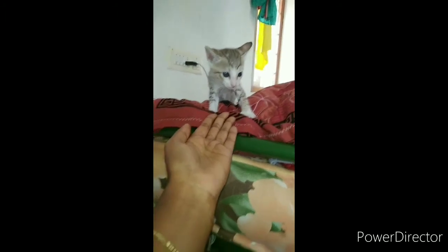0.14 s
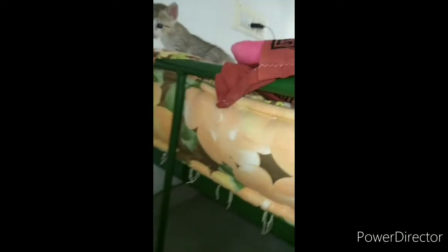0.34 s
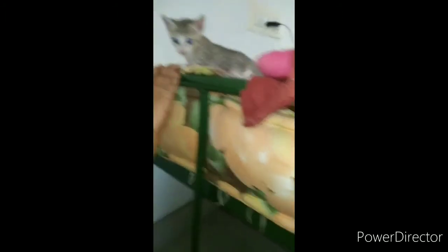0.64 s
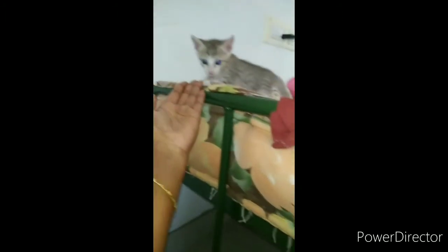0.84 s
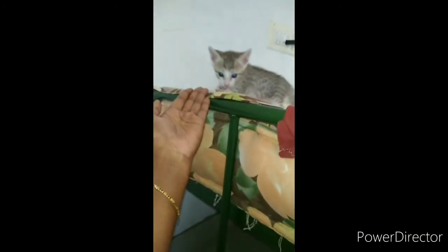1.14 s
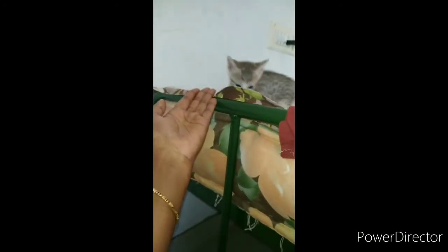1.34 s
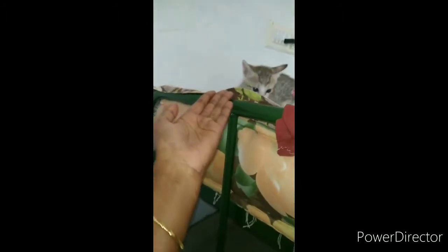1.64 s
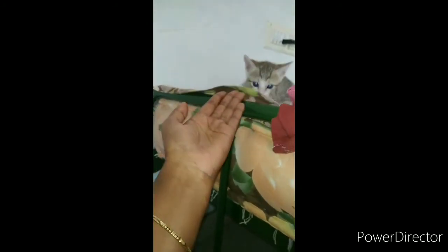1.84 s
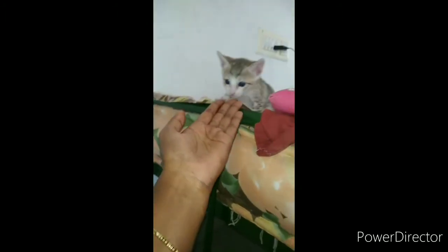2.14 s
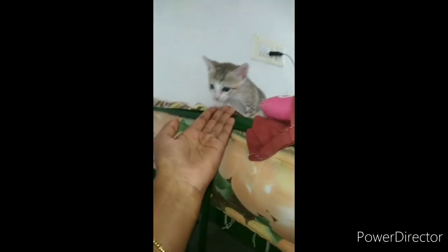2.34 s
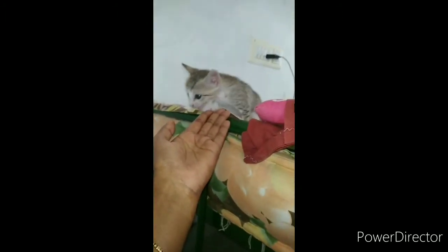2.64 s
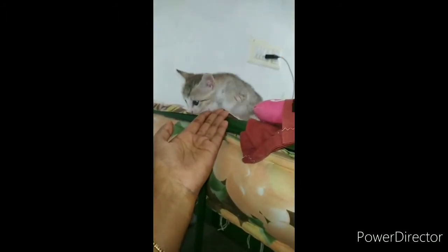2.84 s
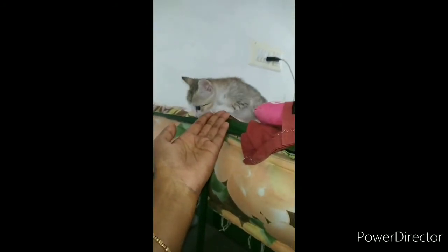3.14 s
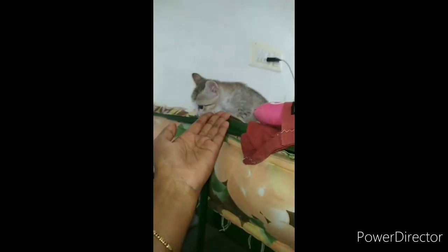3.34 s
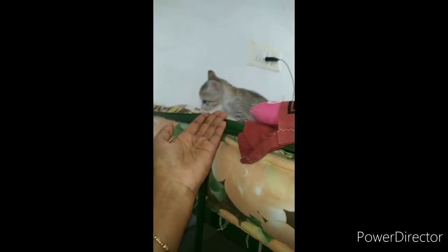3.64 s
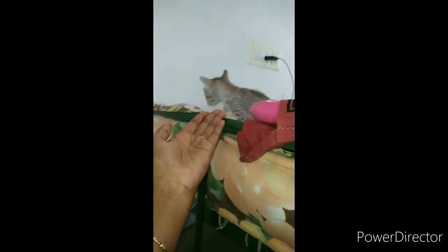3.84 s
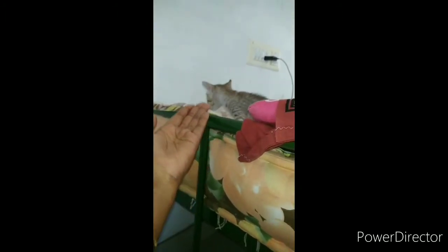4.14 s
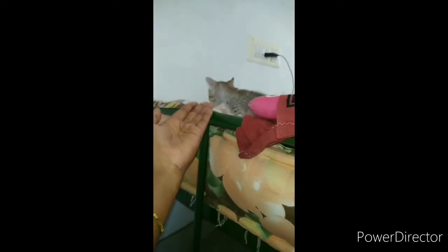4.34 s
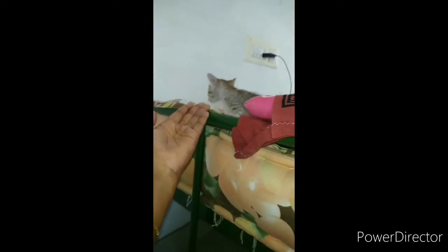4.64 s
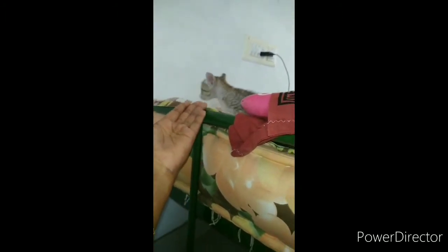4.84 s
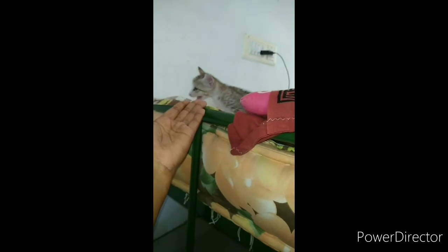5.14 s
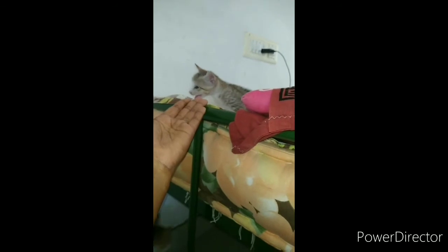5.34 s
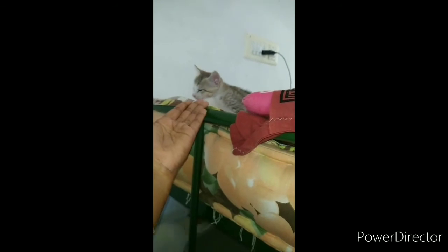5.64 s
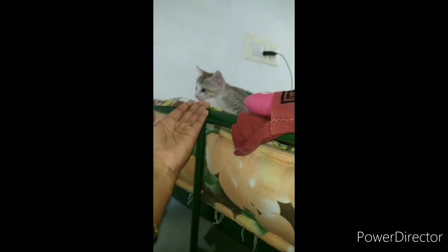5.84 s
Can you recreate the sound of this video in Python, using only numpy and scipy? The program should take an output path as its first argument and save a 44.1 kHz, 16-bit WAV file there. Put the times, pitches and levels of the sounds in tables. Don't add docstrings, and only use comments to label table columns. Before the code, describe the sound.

A hand-held stereo phone in a small furnished room, with soft steady hiss and slight low rumble. Handling hum sits on the left until 0.35 s, with a faint peep; a short falling kitten mew follows at 0.35-0.5. From 1.2 to 1.9 a far kitten's rising mew, a half-grown cat's lower rise and fall, and a bright near mew overlap, with crisp claw snags near 1.3 and cloth rustling. A thin mew wavers and breaks at 2.1-2.6, with claw ticks to 2.7. The loudest open mew arches at 2.7-3.2, cracking as it falls; small far mews follow to 3.45. A light knock comes at 3.65. An older cat calls lower and rougher from 4.0 to 5.1, slowly rising, then breaking downward. A near mew falls at 5.3-5.8, overlapped by a distant one, as taps cluster from 5.4 to the end. Very faint high chirps drift in from outside.

```python
import sys
import numpy as np
from scipy import signal
from scipy.fft import rfft, irfft, next_fast_len
from scipy.io import wavfile
from scipy.ndimage import uniform_filter1d, map_coordinates

SR = 44100
rng = np.random.default_rng(int(sys.argv[2]) if len(sys.argv) > 2 else 0)


def boost_factor(decibels):
    exponent = np.asarray(decibels, float) / 20
    return 10 ** exponent


def generate_wav(signal):
    frames = np.transpose(np.atleast_2d(signal))
    scaled = np.clip(frames, -1, 1) * 32767
    pcm = np.round(scaled).astype(np.int16)
    wavfile.write(sys.argv[1], SR, pcm)


N = 263700
T = np.arange(N) / SR

# t/s, level over rest/dB
HAND_STIRS = [(0, 12.5), (.15, 4.5), (.32, 2), (.5, 0.5), (1.2, 1.3), (1.9, 2), (2.8, 1.4), (3.35, 0.5),
              (4.02, -1.5), (4.5, 2), (5.05, -0.5), (5.3, 1.7), (5.75, 6), (5.98, 5.5)]


def unit(x):
    return x / np.sqrt(np.mean(x ** 2) + 1e-20)


def along(points, hz):
    f, v = np.transpose(points)
    return np.interp(np.log(hz + 1), np.log(f + 1), v)


def wobble(rate, size=N):
    knots = rng.standard_normal(int(size * rate / SR) + 4)
    return map_coordinates(knots, [np.arange(size) * rate / SR])


def filtered(x, response):
    m = next_fast_len(N + 8192)
    return irfft(rfft(x, m) * response(np.fft.rfftfreq(m, 1 / SR)), m)[..., :N]


def coloured(curve, shape=N):
    return unit(filtered(rng.standard_normal(shape), lambda hz: boost_factor(along(curve, hz))))


def span(rows, fade=0.0011):
    s, *cols = np.transpose(rows)
    t = T[(T >= s[0]) & (T < s[-1])]
    edge = np.clip(np.minimum(t - t[0], t[-1] - t) / fade, 0, 1)
    return round(t[0] * SR), [np.interp(t, s, c) for c in cols], edge


def glide(start, length, from_hz, to_hz, db, *steady):
    rise_db, fall_db, peak_at = 4, 6, 0.4
    return [(start, from_hz, db - rise_db, *steady),
            (start + peak_at * length, from_hz + peak_at * (to_hz - from_hz), db, *steady),
            (start + length, to_hz, db - fall_db, *steady)]


def echoes(x):
    # f/Hz, level/dB
    soak = [(300, 4.5), (600, 5.5), (1300, 7), (3000, 2), (8000, 16), (15000, 14)]
    # f/Hz, t60/s
    room = [(300, 0.31), (1300, 0.42), (3000, 0.45), (8000, 0.27), (15000, 0.24)]
    hz, t, z = signal.stft(rng.standard_normal((2, SR // 2)), SR, nperseg=256)
    decay_db = along(soak, hz)[:, None] - 60 * t / along(room, hz)[:, None]
    tail = signal.istft(z * boost_factor(decay_db), SR, nperseg=256)[1]
    late = np.pad(x, (130, 0))[None]
    return signal.fftconvolve(late, tail / np.sqrt(SR / 40), axes=1)


def cat(calls, places, jitter, shimmer_db, lift_db, breath_db, muffle, mouth, first_pan_db, blur, level_bends):
    # t/s, width/s, pitch scatter/share
    cracks = [
        (1.87, 0.03, 0.089),
        (2.458, 0.083, 0.029),
        (3.195, 0.014, 0.086),
        (4.821, 0.098, 0.0504),
        (4.93, 0.047, 0.038),
        (5.09, 0.12, 0.062),
        (5.73, 0.028, 0.018),
    ]
    # f/Hz, level/dB per Hz
    breath_colour = [(350, -70), (700, -16), (1500, -6), (4200, 2.5), (5500, -14), (7000, -3.5),
                     (9000, -27), (11000, -23.5), (14500, -7.5)]
    # f/Hz, level/dB per Hz
    rasp_colour = [(300, -60), (500, -27), (1200, 15), (2200, 5), (4500, -1), (6500, -10)]
    breath_top_db, softening = -29, 0.5
    third_fades = 0.26
    out = np.zeros((2, N + SR))
    hiss, rasp = coloured(breath_colour), coloured(rasp_colour)
    k = np.arange(1, 19)[:, None]
    for rows, (lag, pan_db, room_db, upper_db, third_db) in zip(calls, places):
        start, (pitch, loud_db, opening_db), edge = span(rows)
        size = len(pitch)
        here = slice(start, start + size)
        t = T[here]

        rough = sum(depth * np.exp(-((t - s) / width) ** 2) for s, width, depth in cracks)
        pitch = uniform_filter1d(pitch, size=700, mode="nearest")
        drift = wobble(22.09, size) + 0.92 * wobble(69.57, size)
        pitch = pitch * (1 + jitter * drift + rough * wobble(260, size))
        phase = 2 * np.pi * np.cumsum(pitch) / SR

        low_db = loud_db + np.minimum([-opening_db, opening_db], 0)
        strongest_db = np.max(low_db, 0)
        effort_db = uniform_filter1d(strongest_db, size=1500, mode="nearest")
        effort_db += softening * (effort_db - effort_db.max())
        effort_db += muffle * np.minimum(opening_db, 0)
        first_two = np.add(low_db, np.c_[lift_db])
        third = effort_db + third_db - third_fades * np.maximum(opening_db, 0)
        upper = effort_db + upper_db + along(mouth, k[3:] * pitch)
        level = np.vstack([first_two, third, upper])
        for s, width, which, db in level_bends:
            if abs(s - t).min() < 3 * width:
                level[np.minimum(k[:, 0], 4) == round(which)] += db * np.exp(-((t - s) / width) ** 2)
        shimmer = np.array([wobble(94.57, size) for _ in k])
        level -= shimmer_db * shimmer ** 2 - 0.18
        gain = np.sqrt(2) * boost_factor(level) * (k * pitch < SR / 2.7) * edge

        haze = np.clip(k / 6, 0, 1.5) * np.array([wobble(180, size) for _ in k])
        ports = []
        for side in (-1, 1):
            port_gain = gain * boost_factor(-side * (k == 1) * first_pan_db / 2)
            port_phase = phase + side * np.pi * pitch * lag / SR
            ports.append(np.sum(port_gain * np.sin(k * port_phase + k * k + blur * haze), 0))

        air = hiss[here] * (1 + np.cos(phase))
        breath = boost_factor(min(breath_db, breath_top_db)) * air * np.max(boost_factor(level[:3]), 0) * edge
        crack_gain = 7.0 * rough * boost_factor(uniform_filter1d(strongest_db, size=1500))
        breath += crack_gain * rasp[here] * edge
        tail = boost_factor(room_db) * echoes(ports[0] + breath)
        out[:, here] += (np.array(ports) + breath) * boost_factor([[pan_db / 2], [-pan_db / 2]])
        out[:, start:start + tail.shape[1]] += tail
    return out[:, :N]


def near_kitten():
    # t/s, pitch f/Hz, effort level/dB, mouth opening as 2nd harmonic over 1st/dB
    calls = [
        [(0.333, 1340, -47.5, -4.5), (0.375, 1268, -49.5, -16), (0.405, 1201, -40, -38),
         (0.435, 1222, -56, -20), (0.465, 1259, -48.5, -28), (0.485, 1178, -70, -16), (0.54, 1219, -64.5, -18),
         (0.62, 1215, -81, -22)],
        [(1.43, 1457, -53, -30), (1.45, 1531, -40, -15.5), (1.575, 1627, -42.5, -10.5), (1.642, 1533, -37, -35),
         (1.69, 1443, -44.5, -19), (1.786, 1245, -46, -24), (1.852, 1077, -52, -29), (1.89, 1040, -61, -14)],
        [(2.718, 1087, -49.5, 1), (2.744, 1100, -51.5, -23), (2.815, 1509, -35.5, 15), (2.86, 1612, -39, 1),
         (2.91, 1567, -35.5, 6), (2.995, 1555, -39, -4), (3.075, 1404, -44.5, -8), (3.135, 1230, -45, -2.5),
         (3.178, 976, -46, 4.5)],
        [(5.323, 1720, -45.5, -12), (5.346, 1793, -39.5, -0.5), (5.376, 1752, -37, 3.5), (5.44, 1668, -38, 1.5),
         (5.495, 1627, -38, -9.5), (5.62, 1440, -35, -24), (5.69, 1312, -42, -30), (5.77, 1054, -57.5, -14),
         (5.83, 1034, -65, -10)],
    ]
    # left lag/samples, left-right/dB, room/dB, upper harmonics/dB, 3rd harmonic/dB
    places = [(7.2, 8, -3, -7, -18), (7.3, 3.5, -9.5, -11, -8), (8.1, 6.5, -11.5, -12.5, -10),
              (8.6, 4, -9, -14, -14.5)]
    # f/Hz, level/dB
    mouth = [(3500, 23), (5200, -18), (6500, -8.5), (8000, -14), (9500, -9.5), (12500, -13), (14200, -16)]
    # t/s, width/s, harmonic (4 = all higher), level/dB
    level_bends = [(.391, 0.0053, 1, -11), (2.811, 0.0069, 2, -24), (2.83, .01, 2, 6), (2.854, 0.0095, 2, -9),
                   (2.876, 0.0067, 2, 3.5), (2.909, 0.0026, 2, -3), (2.93, 0.0043, 2, -9), (2.945, .01, 2, 3.5),
                   (2.985, 0.0053, 2, 0), (3.026, 0.02, 1, -22), (3.08, 0.0071, 1, 6.5), (3.15, 0.017, 2, 0),
                   (5.368, 0.0089, 2, 2), (5.47, 0.0083, 2, 11), (5.55, 0.017, 1, -2), (5.644, 0.0088, 1, 2.5),
                   (5.657, .005, 1, -6), (5.68, .07, 3, -16), (5.75, .05, 2, 10), (2.745, 0.012, 1, 6.5),
                   (2.795, 0.016, 1, -5), (2.9, .006, 2, 4.5), (2.919, 0.0056, 2, 7.5), (3.003, 0.0072, 2, 4),
                   (5.62, 0.0089, 1, 1), (3.04, .045, 4, 5.5), (2.82, 0.033, 4, 2), (.435, .008, 1, -5),
                   (.49, 0.013, 1, -9), (5.44, .06, 4, 0), (1.66, 0.041, 2, 6)]
    return cat(calls, places, jitter=0.00443, shimmer_db=2.5, lift_db=[1.5, 7], breath_db=-28, muffle=0.4,
               mouth=mouth, first_pan_db=-6.0, blur=0.64, level_bends=level_bends)


def far_kitten():
    # t/s, pitch f/Hz, effort level/dB, mouth opening as 2nd harmonic over 1st/dB
    calls = [
        [(1.19, 811, -62, -13), (1.26, 1192, -57.5, 3.5), (1.32, 1334, -56.5, 7), (1.365, 1348, -59.5, 11),
         (1.395, 1339, -47.5, 15), (1.46, 1302, -54.5, 6), (1.606, 1198, -39.5, -25.5), (1.636, 1253, -53, -17),
         (1.66, 1260, -88, -9)],
        [(2.065, 1112, -69, 15), (2.12, 1286, -52.5, 13.5), (2.22, 1384, -53.5, 5), (2.31, 1334, -54, 13.5),
         (2.39, 1324, -58.5, -4), (2.425, 1262, -55, -17), (2.454, 1296, -54, -27), (2.532, 1420, -67, -43),
         (2.62, 1277, -102, -39)],
        [(3.025, 1104, -54.5, 9), (3.065, 1218, -53, 16), (3.1, 1306, -56, 16), (3.13, 1280, -58, 12),
         (3.2, 1247, -52, 2), (3.235, 1263, -67, 2)],
        [(3.235, 1231, -61, -4), (3.285, 1247, -54.5, -19), (3.331, 1297, -52.5, -26),
         (3.359, 1366, -49.5, -53), (3.45, 1362, -60, -40)],
        [(5.57, 1377, -54, -2), (5.61, 1390, -47.5, -2.5), (5.67, 1390, -56.5, 9), (5.71, 1400, -56, -3),
         (5.79, 1315, -55, -1.5), (5.866, 1236, -53.5, -12), (5.97, 1154, -73, -5)],
    ]
    # left lag/samples, left-right/dB, room/dB, upper harmonics/dB, 3rd harmonic/dB
    places = [(10.2, 6.7, -9.5, -18, 4.5), (4.6, 10.8, -3.5, -25.5, -9.5), (7, 1.9, -12, -22.5, 0),
              (4.3, 2.9, -12, -12, -27), (9.7, 3.6, -6, -46, -14)]
    # t/s, length/s, from f/Hz, to f/Hz, peak level/dB
    peep_rows = [
        (0, .07, 1230, 1190, -58),
        (.435, .055, 1370, 1485, -55),
        (2.0, .04, 873, 859, -60),
        (.337, .07, 1010, 980, -62),
        (3.99, .045, 990, 1110, -61),
        (5.475, .05, 800, 910, -61),
        (3.176, .024, 880, 740, -55),
    ]
    peep_place = (5, 6, -8, -32, -15)
    # f/Hz, level/dB
    mouth = [(3500, -3), (5300, 5), (6800, 10.5), (8000, 2.5), (9500, 10.5), (12000, 7), (14500, -2)]
    # t/s, width/s, harmonic (4 = all higher), level/dB
    level_bends = [(1.345, .04, 3, 8), (1.335, 0.015, 2, 2), (1.25, .025, 2, -1), (1.23, .04, 1, 1),
                   (1.51, 0.14, 3, -20), (1.54, 0.048, 1, -4.5), (2.237, .005, 2, 7), (2.215, .008, 2, 3.5),
                   (2.229, 0.0026, 2, -10), (2.249, 0.0036, 2, -6), (2.265, 0.012, 2, 4.5),
                   (2.14, 0.023, 2, -3), (2.17, 0.059, 4, -6), (2.41, 0.017, 1, -6), (1.61, 0.016, 1, 4),
                   (2.3, 0.017, 1, 6.5), (2, 0.014, 1, -17), (2.485, .012, 1, 5.5)]
    peeps = [glide(*row, -16) for row in peep_rows]
    return cat(calls + peeps, places + [peep_place] * len(peeps), jitter=0.00586, shimmer_db=8.0,
               lift_db=[1.5, 6], breath_db=-26, muffle=0.66, mouth=mouth, first_pan_db=4.5, blur=0.92,
               level_bends=level_bends)


def young_cat():
    # t/s, pitch f/Hz, effort level/dB, mouth opening as 2nd harmonic over 1st/dB
    calls = [
        [(1.222, 514, -53.5, 2.5), (1.27, 535, -52.5, 5), (1.308, 666, -52.5, -13), (1.385, 869, -55, -13),
         (1.428, 937, -46.5, -14), (1.48, 1048, -46, -12), (1.572, 1046, -49.5, -1), (1.668, 973, -50, -5.5),
         (1.76, 853, -60, -14)],
    ]
    # left lag/samples, left-right/dB, room/dB, upper harmonics/dB, 3rd harmonic/dB
    places = [(0, 0, -24, -6.5, -10)]
    # f/Hz, level/dB
    mouth = [(2900, -6), (3500, 1), (4200, 3), (5200, -19), (6200, -24), (9000, -14), (11000, -18),
             (14500, -24)]
    # t/s, width/s, harmonic (4 = all higher), level/dB
    level_bends = [(1.3, 0.16, 4, -16), (1.34, 0.14, 3, -12), (1.58, 0.11, 2, -3)]
    return cat(calls, places, jitter=0.0033, shimmer_db=2.5, lift_db=[-1.5, -2], breath_db=-40, muffle=0.15,
               mouth=mouth, first_pan_db=0.0, blur=0.55, level_bends=level_bends)


def older_cat():
    # t/s, pitch f/Hz, effort level/dB, mouth opening as 2nd harmonic over 1st/dB
    calls = [
        [(4.0, 345, -62, 2), (4.05, 407.7, -54, -0.5), (4.12, 492, -52.5, -1.5), (4.2, 549.7, -52, 5),
         (4.3, 570.5, -53.5, 1), (4.42, 547.2, -53, 0.5), (4.6, 564.4, -50, -17.5), (4.7, 577, -47, -4),
         (4.794, 531.8, -50.5, -3)],
        [(4.79, 540, -50.5, -3), (4.86, 494.5, -60, 0), (4.93, 438.3, -59.5, 2.5), (4.975, 446, -56, -2),
         (5.045, 422.7, -59, -3.5), (5.12, 401, -67, -10)],
    ]
    # left lag/samples, left-right/dB, room/dB, upper harmonics/dB, 3rd harmonic/dB
    places = [(-6.5, 1, -8.5, -23, -2.5), (-7.5, 0.69, -7.5, -28, -4.5)]
    # f/Hz, level/dB
    mouth = [(2200, 8.5), (2900, 8.5), (3500, -15), (4200, 5.5), (5500, -22), (7000, -15), (9000, -13),
             (11000, -27), (14500, -19)]
    # t/s, width/s, harmonic (4 = all higher), level/dB
    level_bends = [(4.012, 0.025, 2, -11), (4.005, 0.036, 1, -3.5), (4.058, .025, 3, -10), (4.1, 0.015, 2, 5),
                   (4.12, 0.011, 2, -6), (4.125, 0.03, 3, -10.5), (4.15, 0.024, 2, 7), (4.229, 0.011, 2, -13),
                   (4.229, 0.015, 3, -9), (4.4, 0.055, 2, -2.5), (4.41, 0.049, 1, -6.5), (4.488, 0.037, 1, 2.5),
                   (4.575, 0.049, 3, 4), (4.6, .015, 2, -5), (4.645, 0.0099, 2, 9), (4.672, 0.0089, 2, -21),
                   (4.76, 0.015, 1, -29), (4.2, 0.22, 4, 1.5), (4.5, 0.093, 4, 0.5), (4.9, 0.038, 1, -6),
                   (5.005, 0.01, 1, -7), (5.045, 0.014, 1, 7.5), (5.115, 0.027, 1, -14), (4.968, .015, 2, -12)]
    return cat(calls, places, jitter=0.0062, shimmer_db=0.0, lift_db=[0.1, 0.6], breath_db=-27, muffle=0.13,
               mouth=mouth, first_pan_db=5.0, blur=1.07, level_bends=level_bends)


def bedding():
    # t/s, length/s, level/dB, change by its end/dB
    rustles = [
        (0, 0.16, -77, 0),
        (0.382, 0.15, -78.5, 7),
        (1.209, 0.18, -69, 6),
        (1.589, 0.18, -64.5, -6),
        (2.977, 0.32, -66.5, -4),
        (4.074, 0.56, -73, -0.5),
        (4.68, 0.19, -72, -11),
        (5.44, 0.072, -82, -3),
        (5.7, 0.22, -76.5, 2.5),
    ]
    # t/s, peak level/dB, thump level/dB, knock level/dB, t60/s
    taps = [
        (2.0154, -59.5, -25, -15, 0.27),
        (3.648, -57, -0.5, 15.5, 0.026),
        (5.4407, -39.5, -17, -6, 0.018),
        (5.614, -28.5, -13.5, -6.5, 0.013),
        (5.707, -30.5, -18, -32, 0.01),
        (5.7374, -36, -9.5, -25.5, 0.021),
        (5.774, -44.5, -27, -10, 0.038),
        (5.876, -47.5, -7, -15, 0.042),
        (5.914, -35.5, -9.5, -31, 0.015),
        (5.963, -43, -14, -24, 0.021),
    ]
    # f/Hz, level/dB per Hz
    cloth_colour = [(300, -34), (1500, -6), (4000, 1.5), (5500, -3.5), (7000, -0.5), (9000, 6), (12000, -6),
                    (15500, -6)]
    # f/Hz, level/dB per Hz
    knock_colour = [(200, -21), (500, 9), (1200, -6), (2100, -4.5), (3000, -15)]
    rub = np.zeros(N)
    for s, length, from_db, change_db in rustles:
        start, (db,), edge = span([(s, from_db), (s + length, from_db + change_db)], fade=0.035)
        rub[start:start + len(db)] = boost_factor(db + 9.5) * edge
    t = np.arange(SR // 8) / SR
    puff, push, knock = np.zeros((3, N + SR))
    for s, db, thump_db, knock_db, t60 in taps:
        hit = slice(round(s * SR), round(s * SR) + len(t))
        knock[hit] += boost_factor(db + knock_db - 9 - 60 * t / 0.04)
        puff[hit] += boost_factor(db - 1.0 - 60 * t / max(t60 * 3, 0.005)) * (1 - np.exp(-t / 0.0046))
        push[hit] += boost_factor(db + thump_db + 12.0) * np.sin(2 * np.pi * 110 * t) * np.exp(-t / 0.0028)
    grain = rng.standard_normal((2, N)) * boost_factor(0.76 * wobble(150))
    both_ports = grain[0] + 0.39 * grain[1] * np.c_[[1, -1]]
    cloth = unit(filtered(both_ports, lambda hz: boost_factor(along(cloth_colour, hz))))
    clumps = boost_factor(2.2 * wobble(30))
    return cloth * (rub * clumps + puff[:N]) + push[:N] + knock[:N] * coloured(knock_colour)


def claws():
    # t/s, peak level/dB, t60/s
    snags = [(1.193, -63, .008), (1.207, -53, 0.0051), (1.277, -40.5, 0.012), (1.296, -75, .008),
             (1.31, -48, 0.013), (1.322, -41, .012), (1.332, -48, 0.0073), (1.338, -49, .008),
             (2.556, -51, 0.015), (2.5674, -41, .004), (2.57, -55, 0.047), (2.6051, -43, 0.006),
             (2.658, -53, .015), (2.682, -61, 0.014), (2.688, -47.5, 0.007), (4.1066, -57, .012),
             (4.3065, -46, .01)]
    # f/Hz, level/dB per Hz
    claw_colour = [(2500, -30), (5500, -2), (7500, -3), (9200, 11), (11000, -13), (13500, -20),
                   (15500, -5.5)]
    t, bursts = np.arange(SR // 8) / SR, np.zeros(N + SR)
    for s, db, t60 in snags:
        bursts[round(s * SR):][:len(t)] += boost_factor(db - 60 * t / max(t60, 0.004))
    return coloured(claw_colour, (2, N)) * bursts[:N]


def handling_hum():
    # f/Hz, width/Hz, level/dB, left lead/dB
    resonances = [(79, 11, 8, 26), (140, 12, 3, 20), (236, 10.4, 9, 20), (281, 12, -9, 15),
                  (471, 18, -9.5, -1), (642, 7.9, -2, 1), (704, 10, -5, -2), (949, 7.5, -8.5, -9)]
    level_db, ends_s, fade_s = -52.5, 0.354, 0.037

    def body(f):
        return sum(boost_factor([[db], [db - left_db]]) * 1j * f * w / (c * c - f * f + 1j * f * w)
                   for c, w, db, left_db in resonances)

    fade = np.clip((ends_s - T) / fade_s, 0, 1)
    return boost_factor(level_db) * fade * unit(filtered(rng.standard_normal(N), body))


def rumble():
    # f/Hz, level/dB per Hz
    rumble_colour = [(25, -8), (60, -7), (250, -4), (500, -12.5), (900, -32)]
    stir_db = np.interp(T, *np.transpose(HAND_STIRS))
    level_db = -66.5 + 0.59 * stir_db + 1 * wobble(1.86)
    return boost_factor(level_db) * coloured(rumble_colour) * boost_factor([[3.5], [-9]])


def whistle():
    # t/s, length/s, from f/Hz, to f/Hz, peak level/dB
    chirps = [(2.45, .32, 6850, 7000, -63), (3.42, .5, 6450, 7000, -65), (3.35, .15, 8400, 8150, -59),
              (2.45, .08, 9300, 9500, -63), (2.45, .07, 7900, 8050, -63), (3.29, .08, 9000, 9600, -64),
              (4.21, .16, 8400, 9050, -63), (4.21, .1, 3820, 4000, -63), (3.5, 1.6, 9500, 9500, -75),
              (0, .14, 2720, 2680, -64), (5.1, .14, 9300, 9600, -73), (5.08, .25, 6400, 6950, -66),
              (5.325, .05, 3900, 4100, -55)]
    out = np.zeros((2, N))
    for row in chirps:
        start, (hz, db), edge = span(glide(*row), fade=0.0038)
        size = len(hz)
        for port in out:
            phase = 2 * np.pi * np.cumsum(hz + 130 * wobble(300, size)) / SR
            port[start:start + size] += boost_factor(db + 2 * wobble(40, size)) * edge * np.sin(phase)
    return out


def room_hiss():
    # f/Hz, level/dB per Hz
    hiss_colour = [(18, -40), (30, 8), (50, -29), (62, -0.5), (126, -17), (152, -21.5), (300, -18.5),
                   (493, -14), (533, -13), (693, -12), (1400, -19), (1560, -18), (2560, -18), (5770, -27),
                   (6920, -24), (15600, -30)]
    # f/Hz, left-right correlation/1
    likeness = [(40, 1), (300, 0.19), (700, 0.42), (1400, 0.031), (7000, 0.088), (15000, 0.23)]

    def mid_side(hz):
        turn = np.arccos(np.clip(along(likeness, hz), -1, 1)) / 2
        return boost_factor(along(hiss_colour, hz)) * [np.cos(turn), np.sin(turn)]

    mid, side = filtered(rng.standard_normal((2, N)), mid_side)
    stir_db = np.interp(T, *np.transpose(HAND_STIRS))
    level_db = -61.5 + stir_db + 0.53 * wobble(1.73) + 0.069 * wobble(24)
    return boost_factor(level_db) * unit(np.array([mid + side, mid - side]))


def scene():
    voices = near_kitten() + far_kitten() + young_cat() + older_cat()
    touch = bedding() + claws() + handling_hum() + rumble()
    return voices + touch + whistle() + room_hiss()


def masked(x):
    # next band/dB, slope/dB per band, far bands/dB
    spreading = (-20.5, 3, -44)
    # f/Hz, level/dB
    deafness = [(1000, -8), (1950, -2), (2400, -10), (3200, 4), (4500, 1), (5500, 7), (7000, 0), (9500, -5),
                (11500, 1), (13500, 4), (14500, 10)]
    reach_db, slope_db, far_db = spreading
    z = signal.stft(x, nperseg=2048)[2]
    bands = z[:, :1024].reshape(2, 64, 16, -1)
    power = np.sum(np.abs(bands) ** 2, 2)
    band = np.arange(64)
    above = band[:, None] - band
    spread = np.where(above > 0, boost_factor(2 * np.maximum(reach_db - slope_db * above, far_db)), 0)
    deaf = boost_factor(2 * along(deafness, (band + 0.5) * SR / 128))[:, None]
    keep = power > deaf * np.max(spread[None, :, :, None] * power[:, None], axis=2)
    z[:, :1024] = (bands * keep[:, :, None]).reshape(2, 1024, -1)
    return signal.istft(z, nperseg=2048)[1][:, :N]


def low_pass(x):
    return signal.sosfilt(signal.butter(12, 15600, fs=SR, output="sos"), x)


def record(dry):
    top_hz, steepness = 15520, 80
    limited = filtered(dry, lambda hz: 1 / (1 + (hz / top_hz) ** steepness))
    return low_pass(masked(limited))


dry = scene()
out = record(dry)
generate_wav(out)
```